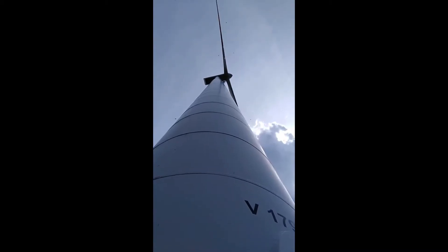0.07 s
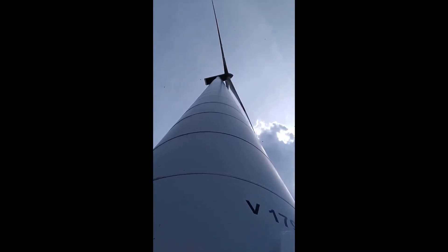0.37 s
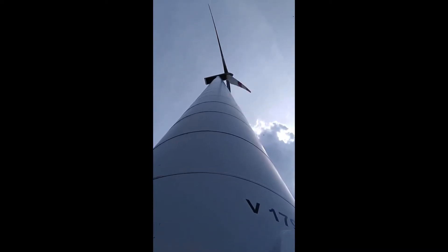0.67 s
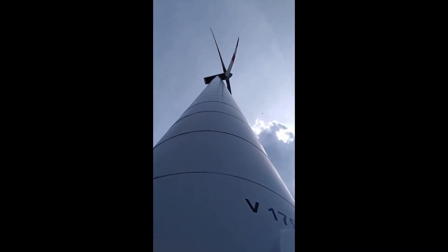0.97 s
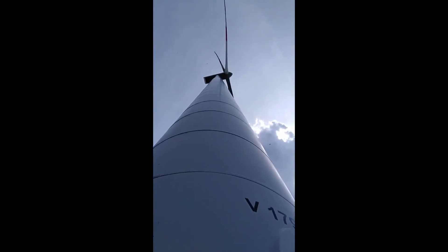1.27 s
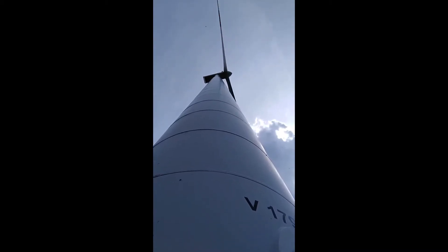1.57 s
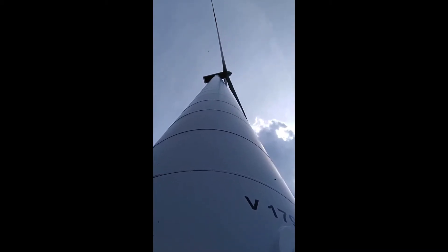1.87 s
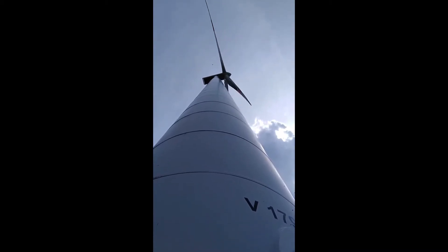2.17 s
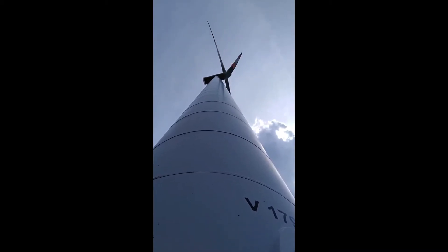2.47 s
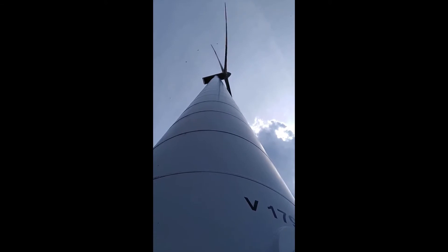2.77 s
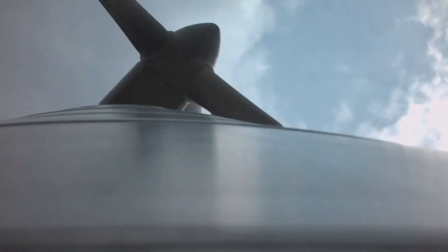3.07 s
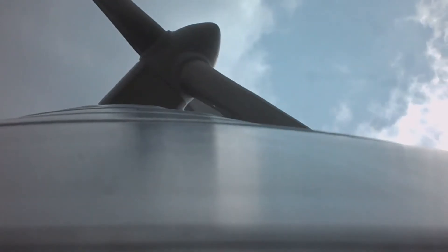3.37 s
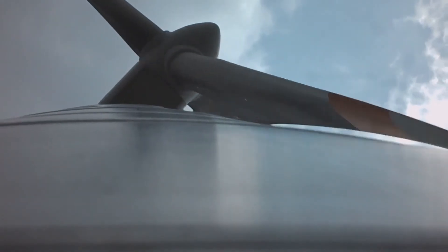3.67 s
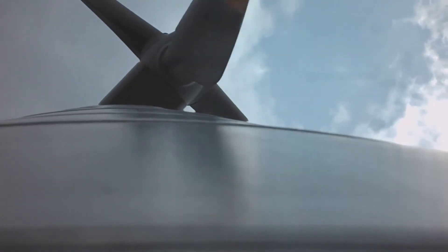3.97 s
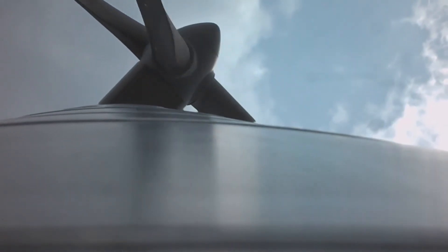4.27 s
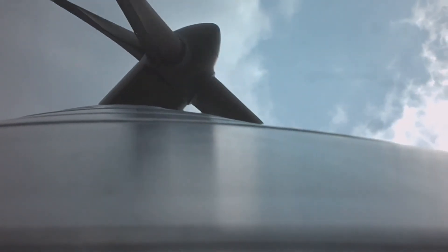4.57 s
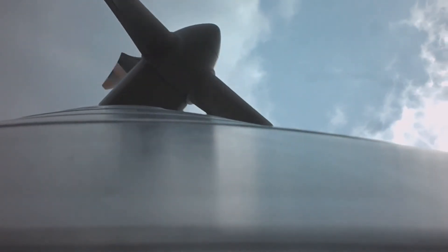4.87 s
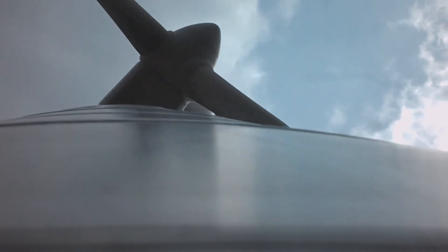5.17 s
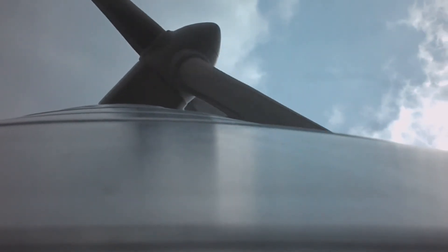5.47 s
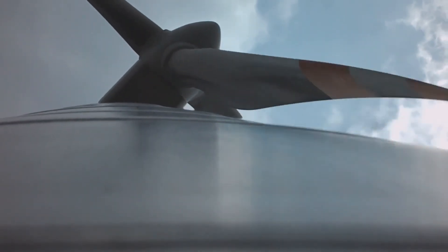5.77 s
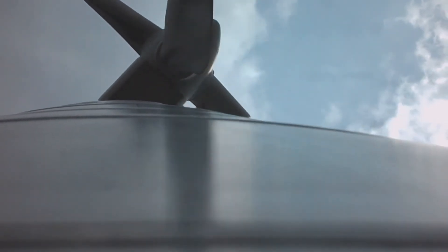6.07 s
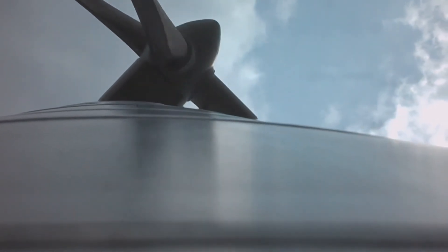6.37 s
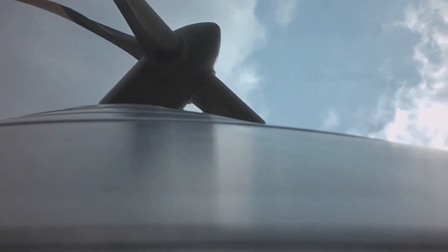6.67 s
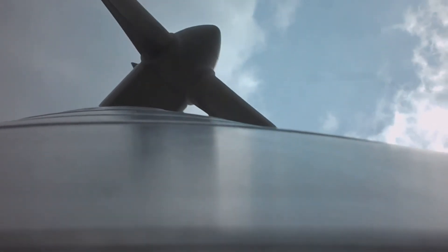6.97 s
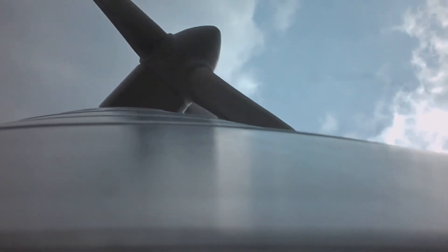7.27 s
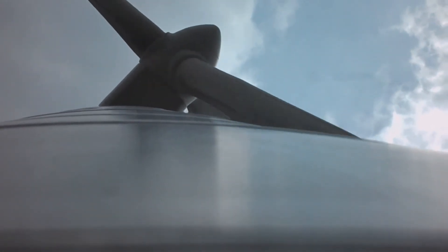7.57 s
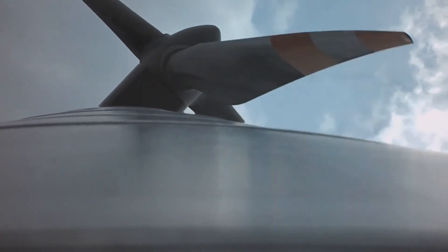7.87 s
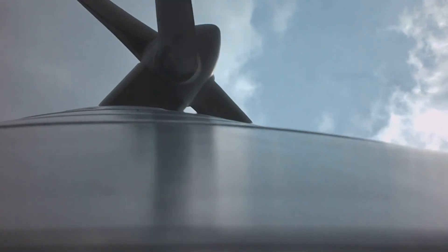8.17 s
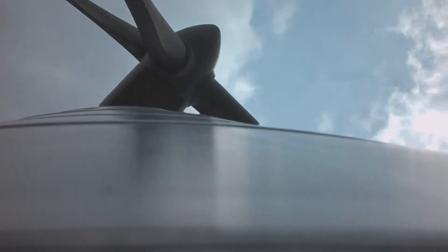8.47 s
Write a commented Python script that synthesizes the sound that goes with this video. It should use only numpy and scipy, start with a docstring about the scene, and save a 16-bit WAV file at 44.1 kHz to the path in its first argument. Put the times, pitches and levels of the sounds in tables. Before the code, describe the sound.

For the first 3 seconds, wind buffets the microphone outdoors in stereo, with low, uneven gusts and small thumps shifting between left and right. Very faint air hiss and distant bird peeps lie behind it. At 3 seconds everything cuts to silence. At about 3.6 seconds a wind turbine comes in abruptly, louder, in mono and through a duller microphone. Its blades roar and hiss steadily overhead, barely swelling, while the tower gives a low hum and a wavering gear tone that dips about every two seconds. A songbird warbles in short whistles, chips and buzzes from about 3.7 to 8.2 seconds. Feet scuff irregularly on gravel between 4.5 and 8.4 seconds. Something small and hard clicks sharply, close by, at about 7.1 seconds, and a few soft low bumps touch the microphone between 7 and 8 seconds. The turbine continues to the end, around 8.6 seconds.

```python
"""At the foot of a wind turbine, from two microphone positions with a short silence between them.
First, in stereo, gusts buffet the microphone over a faint hiss of air and far birds. Then, louder and in
mono through a duller microphone, the blades roar overhead and the tower hums with its gear tones;
a songbird warbles among the trees, feet scuff on gravel and something small and hard clicks close by."""
import sys
import numpy as np
from scipy import signal
from scipy.fft import rfft, irfft, next_fast_len
from scipy.io import wavfile

SR = 44100
rng = np.random.default_rng(int(sys.argv[2]) if len(sys.argv) > 2 else 0)


def wrap_up_sound(samples):
    """Save the sound to the file named by the first command line argument, as 16-bit audio."""
    columns = np.atleast_2d(samples).T
    # keep every value between -1 and 1, then stretch to whole-number steps
    tamed = np.clip(columns, -1, 1)
    steps = np.round(tamed * 32767).astype(np.int16)
    wavfile.write(sys.argv[1], SR, steps)


N = 379701
TIME = np.arange(N) / SR

# roar of the blades, heard from below: (frequency [Hz], relative level [dB])
ROAR_SPECTRUM = [(22, -22), (50, -9), (70, -3.5), (100, -4.5), (135, 3), (200, -1.5), (310, -4), (420, -5),
                 (580, -10.5), (800, -10.5), (1300, -18), (2500, -22.5), (6000, -26.5)]
# hiss of the blades: (frequency [Hz], relative level [dB])
HISS_SPECTRUM = [(500, -9), (1500, -10), (3000, -4.5), (4500, -1.5), (6000, 3.5), (7000, -0.5),
                 (8200, -3.5), (10300, -13), (11000, -52)]
# that hiss easing with the wind: (time [s], level [dB])
HISS_LEVELS = [(3.6, -42.2), (5.0, -41.2), (8.6, -42.6)]
# generator tones from the tower: (frequency [Hz], level [dB], width [Hz])
HUM_TONES = [(66.5, -46.5, 5), (119, -40.5, 2.47), (239, -51.5, 4.03), (407, -52.5, 11.65),
             (667, -59.5, 14.3), (752, -58.5, 10.23), (815, -59.5, 16.1), (1148, -62.5, 13.7),
             (1636, -65, 8.8)]
# the gear tone between blade passes: (time [s], level [dB])
GEAR_LEVELS = [(3.6, -47), (4.45, -40), (5.5, -43.7), (6.7, -45.3), (7.5, -45.3), (8.5, -41.5)]
# wind on the microphone: (frequency [Hz], relative level [dB])
BUFFET_SPECTRUM = [(25, -34), (38, -24), (55, -5.5), (100, 2), (150, -4.5), (220, -12.5), (350, -20.5),
                   (480, -29.5), (800, -46), (1100, -65), (2500, -78.5), (8000, -100)]
# the breeze between gusts: (time [s], relative level [dB], left over right [dB])
BREEZE_LEVELS = [(0.0, -39.5, -1), (0.3, -37, -9.5), (0.7, -34.5, -6), (1.15, -33.5, 1), (1.45, -35.5, 2),
                 (1.95, -35.5, 2.5), (2.15, -38.5, 1), (2.65, -39, -1.5), (3.0, -34, -6)]
# gusts: (peak time [s], relative level [dB], half length [s], left over right [dB])
GUST_SWELLS = [(0.304, -33, 0.036, -13), (0.43, -30.5, .04, -10.5), (0.827, -28, 0.042, 1),
               (0.992, -29, .02, -11.5), (1.16, -35, .025, 0), (1.34, -32.5, 0.037, 8),
               (1.427, -30.5, .03, 3), (1.545, -31.5, 0.023, 14), (1.755, -31, .04, 14),
               (1.837, -31, .02, 15), (2.262, -36, 0.056, -10), (2.43, -32.5, 0.019, -12),
               (2.581, -29, .045, -14), (2.81, -26.5, .03, -1), (2.91, -31, 0.024, 1)]
# eddies slapping a port: (time [s], peak [dB], period [s], left over right [dB], rustle [dB])
EDDY_SLAPS = [(.448, -24, 0.0096, 2, -80), (.856, -34, 0.0033, 9, -90), (0.986, -20.5, 0.0034, -13.5, -79),
              (0.998, -27, 0.0076, -7, -82), (1.738, -22, 0.0047, 18.5, -86),
              (1.844, -19.5, 0.0085, 15.5, -80), (2.569, -23.5, 0.0079, -8, -77),
              (2.83, -24.5, 0.0047, -8, -84), (2.9, -26.5, 0.0037, -16, -70)]
# the songbird's clear whistles: (start [s], length [s], final pitch [Hz], level [dB])
SONG_SLURS = [(4.589, .055, 2230, -34.5), (4.755, 0.054, 2080, -39.5), (4.882, 0.056, 2665, -37.5),
              (5.21, .09, 3720, -40), (6.228, .024, 2624, -34), (6.658, 0.039, 2590, -42),
              (6.849, 0.056, 3570, -34.5), (7.086, 0.064, 3610, -34), (7.312, 0.0614, 2625, -32.5),
              (7.686, 0.065, 2630, -33.5), (7.81, 0.093, 3410, -44.5), (8.162, 0.018, 2320, -37),
              (8.184, 0.049, 2030, -44.5)]
# its hoarse chips: (start [s], middle pitch [Hz], level [dB], fall [octaves])
SONG_CHIPS = [(4.41, 3100, -40.5, 1.0), (5.33, 2450, -39.7, .62), (5.758, 3590, -40.5, .26),
              (6.125, 2100, -41, 0.17), (6.3, 1980, -40, .1), (6.436, 2200, -38.5, .4),
              (6.625, 2444, -44.5, .5), (6.703, 1960, -40.5, 0.19), (7.282, 3950, -44, .3)]
# its buzzes: (start [s], length [s], pitch [Hz], level [dB])
SONG_BUZZES = [(3.666, 0.092, 3750, -43.5), (4.039, 0.062, 2900, -45), (4.11, .11, 4450, -43.5),
               (5.07, 0.064, 4190, -36.5), (5.731, .028, 3200, -38.5), (6.933, .036, 4420, -37),
               (7.183, 0.045, 4290, -36.5)]
# gravel underfoot: (frequency [Hz], relative level [dB])
GRAVEL_SPECTRUM = [(250, -9), (500, -13.5), (800, 2), (1050, 6), (1800, 1), (2700, -0.5), (3600, 1),
                   (5200, 3), (7000, -5), (10000, -21)]
# scuffs: (time [s], level [dB], rise [s], decay [s], brightness [dB], relative knock [dB])
FOOT_SCUFFS = [(4.489, -29.5, 0.01, 0.011, 6, -11), (4.897, -27, 0.0098, 0.017, -5, -7.5),
               (5.187, -24.5, 0.0094, .022, -2, -14), (5.529, -29.5, 0.005, 0.014, 5, -23),
               (6.262, -29.5, .012, 0.021, -4, -4.5), (6.425, -36, 0.0031, 0.013, 7.5, -12),
               (6.765, -29.5, 0.011, 0.017, -9, -16), (7.054, -24.5, 0.0084, 0.021, -2, -17),
               (8.377, -22, 0.0043, 0.016, 3.5, -2.5)]
# modes of the small hard thing that clicks: (frequency [Hz], relative level [dB], t60 [s])
SNAP_MODES = [(490, -25, .03), (1490, -2.5, 0.0067), (2310, -3, 0.0037), (3600, -7.5, 0.0054),
              (4880, 1.5, 0.0045), (5900, 5, 0.0051), (6950, 2, 0.0033), (8200, -3.5, 0.0036)]
# soft bumps on the microphone: (time [s], level [dB], half length [s], pitch [Hz])
MIC_BUMPS = [(6.981, -24, 0.016, 110.3), (7.373, -34, 0.024, 65.3), (8.011, -31, 0.026, 81.3)]
# a dry rustle nearby: (frequency [Hz], relative level [dB])
BRUSH_SPECTRUM = [(600, -1.5), (1050, 10), (1400, 19), (1700, 2.5), (2100, 4.5), (3000, -9), (4500, -15),
                  (6300, -0.5), (6900, -7.5), (8000, 4.5), (12300, -2), (13500, -13)]
# breathy tones behind the wind: (start [s], middle pitch [Hz], level [dB])
BREATHY_TONES = [(.02, 880, -75.5), (.5, 1030, -76), (.66, 935, -70), (.99, 930, -71), (1.22, 1020, -77.5),
                 (1.34, 712, -68), (1.6, 975, -80), (1.99, 1010, -79), (2.09, 700, -68), (2.19, 790, -71),
                 (2.54, 940, -76)]
# birds in the distance: (start [s], middle pitch [Hz], level [dB], fall [octaves])
FAR_PEEPS = [(.312, 4120, -87, 0), (.435, 4100, -87, 0), (.547, 6680, -82, .11), (.565, 3060, -84, 0),
             (1.175, 3730, -77.5, .06), (1.277, 6350, -83.5, 0), (1.997, 6480, -78.5, .17),
             (2.08, 6570, -74, .13), (2.178, 5950, -74, .26), (2.24, 3010, -86.5, .07),
             (2.27, 5750, -82, .07)]
# hiss of the open air: (frequency [Hz], relative level [dB])
AIR_SPECTRUM = [(100, 6), (1200, 0.5), (2500, -5.5), (5000, -9.5), (8000, -15), (14000, -10.5)]


def turbine(overhead_s=4.025, blade_period_s=1.963, half_pass_s=.169):
    """From the foot of the tower: three blades sweep overhead in turn while the machinery runs."""
    passing = sum(hump(overhead_s + k * blade_period_s, half_pass_s) for k in range(3))
    return blades(passing) + generator_hum() + gear_tone(passing)


def blades(passing, roar_db=-37, swish_db=.24, churn_db=1.07, flutter_db=1.58):
    """The blades roar and hiss, a little more as each sweeps over the microphone."""
    roar = coloured(ROAR_SPECTRUM) * from_db(roar_db + swish_db * passing + churn_db * drift(10.4))
    hiss_db, = in_time(HISS_LEVELS)
    hiss = coloured(HISS_SPECTRUM) * from_db(hiss_db + swish_db * passing + flutter_db * drift(9.4))
    return roar + hiss


def generator_hum(waver_db=2.44):
    """The tower radiates the generator's tones, each wavering in level and pitch."""
    return sum(from_db(db + waver_db * drift(width)) * sine(hz + width / 2 * drift(width))
               for hz, db, width in HUM_TONES)


def gear_tone(passing, mesh_hz=485.8, lift_hz=2.98, sag_db=8.5, waver_hz=2.2, waver_db=2.2):
    """The gear mesh tone wavers; it sags in level and lifts in pitch as a blade passes."""
    pitch = mesh_hz + lift_hz * passing + waver_hz * drift(11.9)
    mesh_db, = in_time(GEAR_LEVELS)
    return from_db(mesh_db - sag_db * passing + waver_db * drift(7)) * sine(pitch)


def wind(gain_db=1.0, shared=.25):
    """Right on the microphone, gusts add power to the breeze; each port has mostly its own turbulence."""
    breeze_db, balance_db = in_time(BREEZE_LEVELS)
    power = (from_db(breeze_db) * panned(balance_db)) ** 2
    for s, db, half_length, side_db in GUST_SWELLS:
        power += (from_db(db) * panned(side_db)) ** 2 * hump(s, half_length)
    ports = np.array([port_turbulence(), port_turbulence()]) + shared * port_turbulence()
    return rms_one(ports) * from_db(gain_db) * np.sqrt(power)


def port_turbulence(large_swell_db=2.5, small_swell_db=4.0, split_hz=280):
    """Lumpy pressure at one microphone port; the small fast whirls swell more than the large ones."""
    flow, swell = coloured(BUFFET_SPECTRUM), drift(13.8)
    large = soften(flow, split_hz)
    small = flow - large
    return rms_one(large * from_db(large_swell_db * swell) + small * from_db(small_swell_db * swell))


def eddies(rustle_s=.012, rustle_hz=1400):
    """Now and then one eddy pulls and pushes hard at the ports, with a faint rustle."""
    rustle = rms_one(soften(rng.standard_normal(N), rustle_hz))
    out = np.zeros((2, N))
    for s, peak_db, period, side_db, rustle_db in EDDY_SLAPS:
        at = np.flatnonzero(np.abs(TIME - s) < .06)
        t = TIME[at] - s
        phase = 2 * np.pi * t / period
        slap = from_db(peak_db) * phase * np.exp(np.maximum((1 - phase ** 2) / 2, -50))
        puff = from_db(rustle_db) * rustle[at] * np.exp(-np.abs(t) / rustle_s)
        out[:, at] += (slap + puff) * panned(side_db)
    return out


def songbird(scoop_octaves_per_s=2.4, chip_s=.046):
    """A warble of scooped whistles, falling chips and level buzzes, scattered by the trees."""
    slurs = [(s, length, hz, db, scoop_octaves_per_s * length) for s, length, hz, db in SONG_SLURS]
    chips = [(s, chip_s, hz, db, -fall) for s, hz, db, fall in SONG_CHIPS]
    buzzes = [(s, length, hz, db, 0) for s, length, hz, db in SONG_BUZZES]
    song = whistles(slurs, rasp=.11, scooped=True) + whistles(chips, rasp=.8) + whistles(buzzes, rasp=1)
    return outdoors(song, wet_db=-5.2, t60=.41)


def footsteps(grain_db=2.0, split_hz=2500, sole_lead_s=.0018, knock_hz=680, knock_s=.013):
    """The sole presses down dully, at times with a hollow knock; then the grit crunches in tiny grains."""
    crunch = rms_one(coloured(GRAVEL_SPECTRUM) * from_db(grain_db * drift(620)))
    sole = soften(crunch, split_hz)
    knock = rms_one(ring(crunch, knock_hz, t60=.016))
    out = np.zeros(N)
    for s, db, rise, decay, bright_db, knock_db in FOOT_SCUFFS:
        at = np.flatnonzero(np.abs(TIME - s) < .2)
        t = TIME[at] - s
        grit = (crunch[at] - sole[at]) * from_db(bright_db)
        for part, since in ((sole[at], t + sole_lead_s), (grit, t)):
            out[at] += from_db(db) * part * np.exp(np.minimum(since / rise, -since / decay))
        out[at] += from_db(db + knock_db) * knock[at] * np.exp(-np.abs(t) / knock_s)
    return outdoors(out, wet_db=-6.5, t60=.46)


def click(s=7.1422, hit_db=-3, rebound_s=.0009, rebound_db=-17):
    """Close to the microphone, a sharp snap and its rebound ring a few short modes."""
    hits = np.zeros(N)
    hits[round(s * SR)] = from_db(hit_db)
    hits[round((s + rebound_s) * SR)] = from_db(hit_db + rebound_db)
    return sum((-1) ** k * from_db(db) * ring(hits, hz, t60)
               for k, (hz, db, t60) in enumerate(SNAP_MODES))


def bumps(pitch_wobble=.25):
    """Short low thuds on the microphone itself."""
    return sum(from_db(db) * hump(s, half_length) * sine(hz * (1 + pitch_wobble * drift(40.3)))
               for s, db, half_length, hz in MIC_BUMPS)


def brush(s=2.81, level_db=-56, rise_s=.0055, decay_s=.011):
    """Nearby, a faint brushing sound swells and stops."""
    swell = np.exp(np.maximum(np.minimum((TIME - s) / rise_s, (s - TIME) / decay_s), -50))
    return outdoors(from_db(level_db) * swell * coloured(BRUSH_SPECTRUM), wet_db=-8.5, t60=.3)


def faint_tones(length_s=.105, rise_octaves=.08):
    """Soft unsteady tones rise a little, nearly lost in the wind."""
    notes = [(s, length_s, hz, db, rise_octaves) for s, hz, db in BREATHY_TONES]
    return whistles(notes, rasp=.44, rasp_rate=72)


def far_birds(peep_s=.026):
    """Thin short peeps from a long way off."""
    peeps = [(s, peep_s, hz, db, -fall) for s, hz, db, fall in FAR_PEEPS]
    return outdoors(whistles(peeps, rasp=.2), wet_db=-6.5, t60=.35)


def air(level_db=-83):
    """The open air hisses faintly behind the wind."""
    return from_db(level_db) * coloured(AIR_SPECTRUM)


def outdoors(x, wet_db, t60, first_echo_s=.012):
    """Trees and ground scatter the sound back to the microphone as a thin tail of echoes."""
    t = TIME[:SR // 2]
    echoes = rng.standard_normal(len(t)) * (rng.random(len(t)) < .05)
    echoes *= (t > first_echo_s) * from_db(-60 * t / t60)
    return x + from_db(wet_db) * signal.fftconvolve(x, echoes / np.linalg.norm(echoes))[:N]


def dull_microphone(x, ceiling=.85, notch_hz=7685, notch_width_hz=760, cutoff_hz=10650):
    """The port leaves a notch in the treble, peaks are rounded and the top octave is lost."""
    notched = signal.lfilter(*signal.iirnotch(notch_hz, notch_hz / notch_width_hz, fs=SR), x)
    return low_pass(ceiling * np.tanh(notched / ceiling), cutoff_hz)


def whistles(notes, rasp, rasp_rate=300, rasp_depth=.08, rasp_db=3.0, scooped=False):
    """Notes glide through their pitch or scoop up to it; rasp shakes pitch and strength."""
    out, shake, tremble = np.zeros(N), drift(rasp_rate), drift(rasp_rate / 2)
    for s, length, hz, db, rise_octaves in notes:
        at = np.arange(int(s * SR), int((s + length) * SR))
        progress = np.linspace(0, 1, len(at))
        glide = (progress - 1) ** 3 if scooped else progress - .5
        pitch = hz * 2 ** (rise_octaves * glide) * (1 + rasp_depth * rasp * shake[at])
        swell = np.sqrt(2 * np.abs(np.sin(np.pi * progress)))
        out[at] += swell * from_db(db + rasp_db * rasp * tremble[at]) * sine(pitch)
    return out


def from_db(db):
    return 10 ** (np.asarray(db) / 20)


def rms_one(x):
    return x / np.sqrt(np.mean(x ** 2) + 1e-20)


def in_time(rows):
    """Each column of a curve at every sample."""
    s, *columns = np.transpose(rows)
    return [np.interp(TIME, s, column) for column in columns]


def panned(balance_db):
    """Left and right gains of constant power."""
    gains = from_db(np.array([[.5], [-.5]]) * balance_db)
    return gains / np.sqrt(np.mean(gains ** 2, axis=0))


def hump(s, half_length):
    """A bell-shaped swell of height 1 around a moment."""
    out = np.zeros(N)
    near = slice(*np.searchsorted(TIME, [s - 4 * half_length, s + 4 * half_length]))
    out[near] = np.exp(-((TIME[near] - s) / half_length) ** 2)
    return out


def drift(rate):
    """A smooth random wander of spread 1 that changes about `rate` times a second."""
    step, settle = 20, 4000
    r = np.exp(-2 * np.pi * rate * step / SR)
    noise = rng.standard_normal(N // step + settle + 2)
    slow = signal.lfilter([1], [1, -2 * r, r * r], noise)[settle:]
    return np.interp(np.arange(N) / step, np.arange(len(slow)), rms_one(slow))


def coloured(spectrum):
    """Noise with the given spectrum, rms 1."""
    size = next_fast_len(N)
    hz, level_db = np.transpose(spectrum)
    bins = np.arange(1, size // 2 + 2) * SR / size
    gain = from_db(np.interp(np.log(bins), np.log(hz), level_db)) * np.minimum(bins / hz[0], 1)
    return rms_one(irfft(rfft(rng.standard_normal(size)) * gain, size)[:N])


def ring(clicks, hz, t60):
    """A unit click sets a sine of height 1 ringing."""
    r, w = from_db(-60 / (t60 * SR)), 2 * np.pi * hz / SR
    return signal.lfilter([0, np.sin(w)], [1, -2 * r * np.cos(w), r * r], clicks + 1e-18)


def sine(hz):
    """A tone that follows a pitch curve."""
    return np.sin(2 * np.pi * (np.cumsum(hz) / SR + rng.random()))


def soften(x, hz):
    """A gentle first-order treble roll-off."""
    return signal.sosfilt(signal.butter(1, hz, "low", fs=SR, output="sos"), x)


def low_pass(x, hz):
    """A steep treble cut that keeps clicks short."""
    taps = signal.firwin(161, hz, window="blackman", fs=SR)
    return signal.lfilter(taps, [1], np.roll(x, -80, axis=-1))  # the roll cancels the filter's delay


def scene(wind_end_s=3.001, turbine_start_s=3.591, fade_s=.002):
    """The windy stereo position stops dead; after a silence comes the turbine, in mono."""
    windy = wind() + eddies() + faint_tones() + air() + far_birds() + brush()
    under_blades = dull_microphone(turbine() + songbird() + footsteps() + bumps() + click())
    fade_in = np.clip((TIME - turbine_start_s) / fade_s, 0, 1)
    return windy * (TIME < wind_end_s) + under_blades * fade_in


def record(dry):
    """The highest treble is cut at both positions."""
    return low_pass(dry, hz=14200)


dry = scene()
out = record(dry)
wrap_up_sound(out)
```